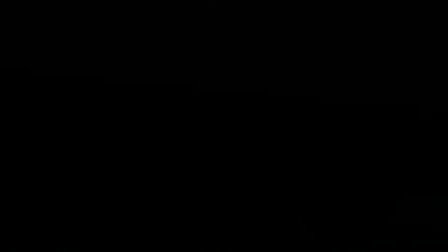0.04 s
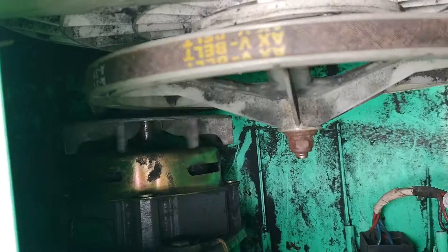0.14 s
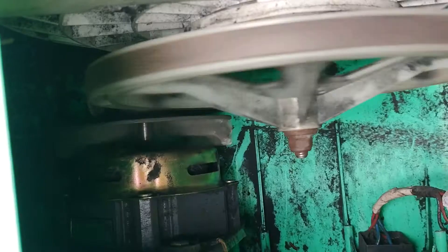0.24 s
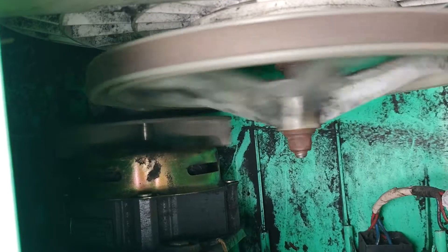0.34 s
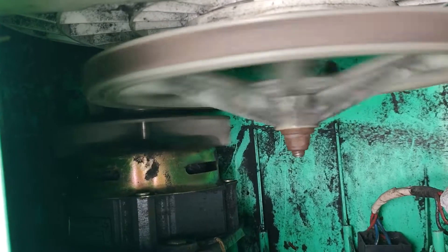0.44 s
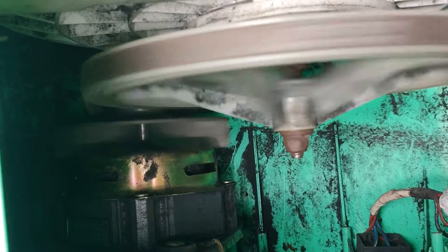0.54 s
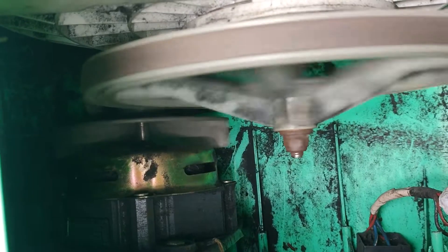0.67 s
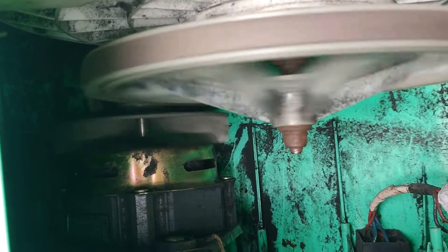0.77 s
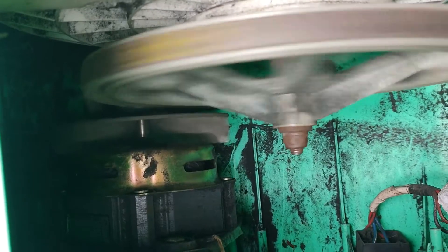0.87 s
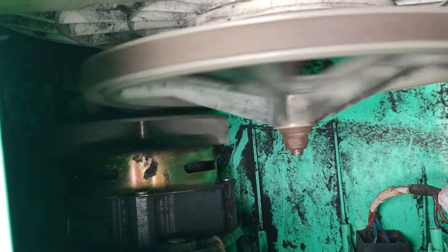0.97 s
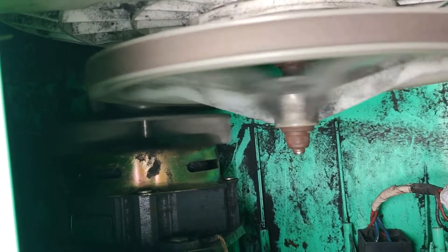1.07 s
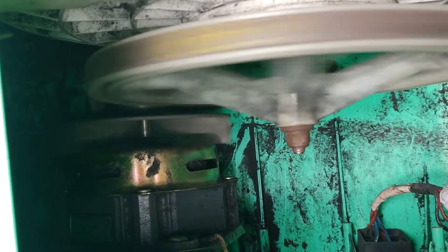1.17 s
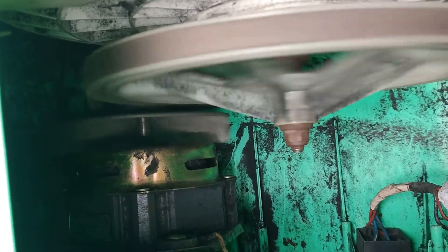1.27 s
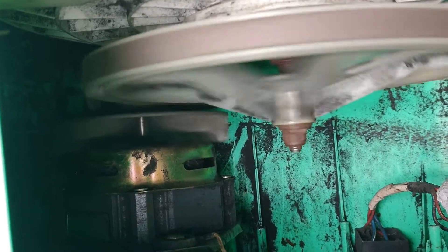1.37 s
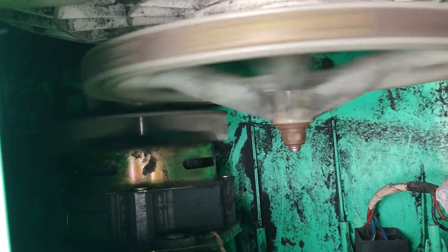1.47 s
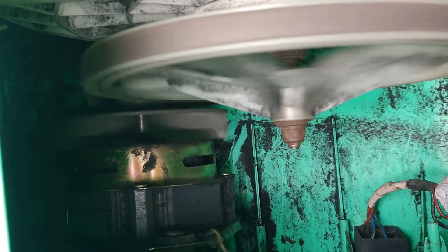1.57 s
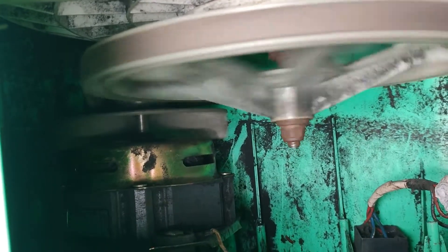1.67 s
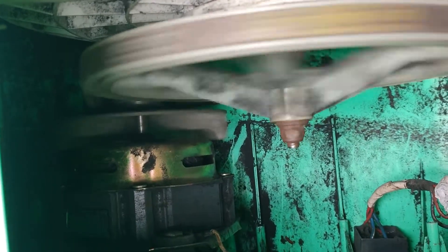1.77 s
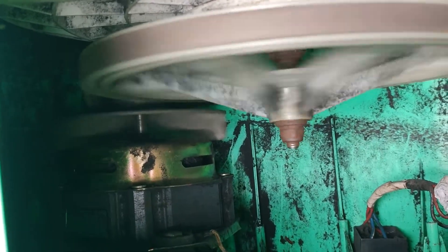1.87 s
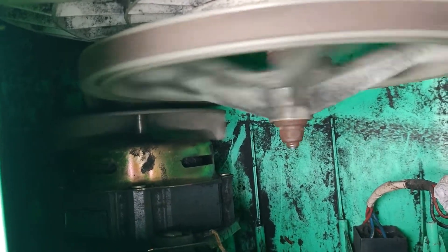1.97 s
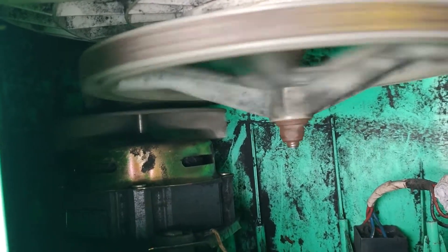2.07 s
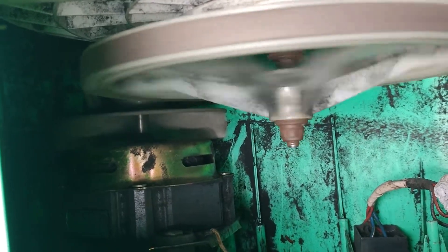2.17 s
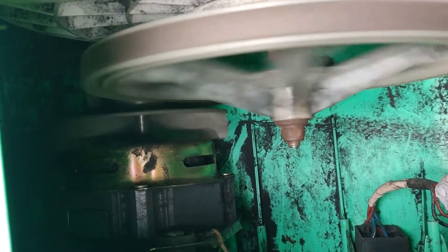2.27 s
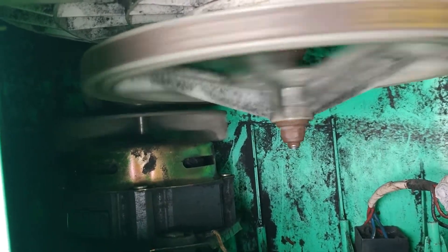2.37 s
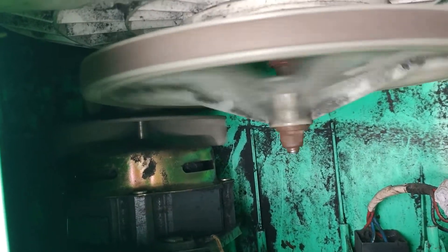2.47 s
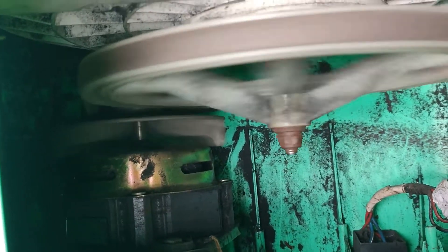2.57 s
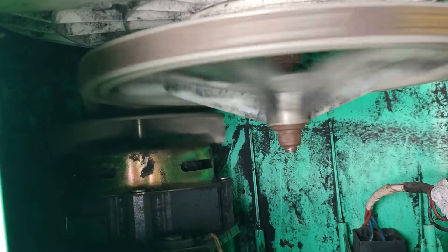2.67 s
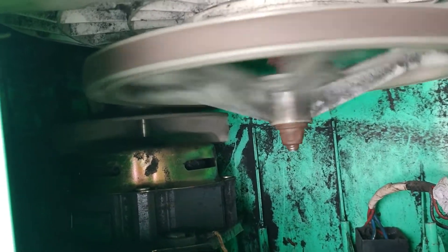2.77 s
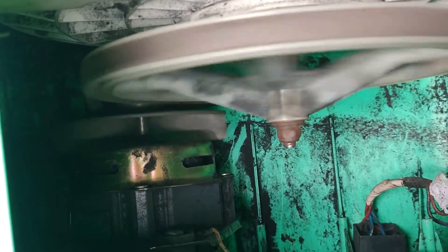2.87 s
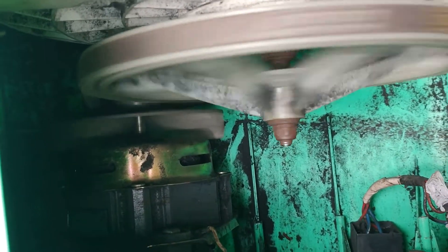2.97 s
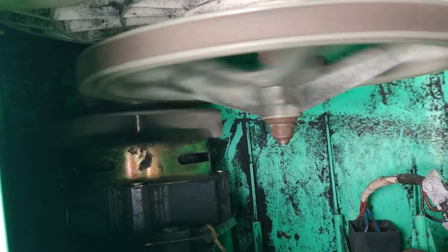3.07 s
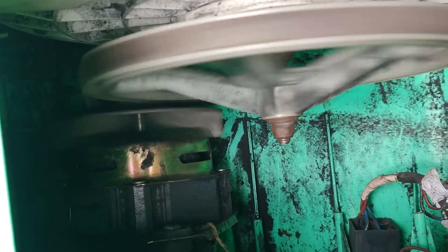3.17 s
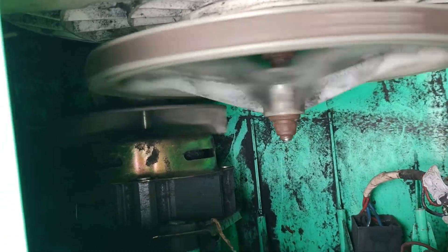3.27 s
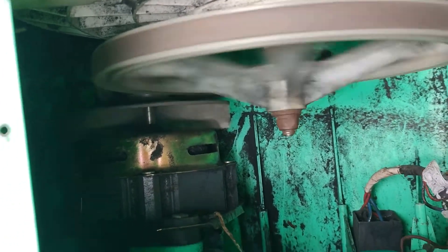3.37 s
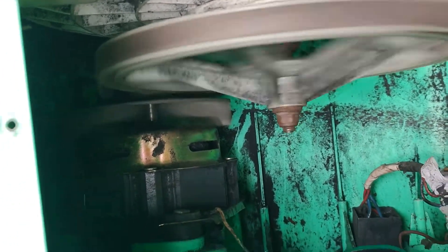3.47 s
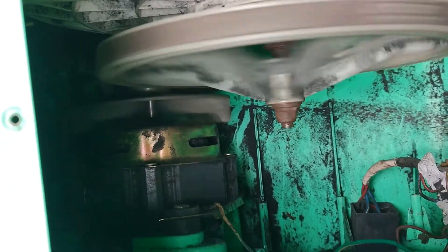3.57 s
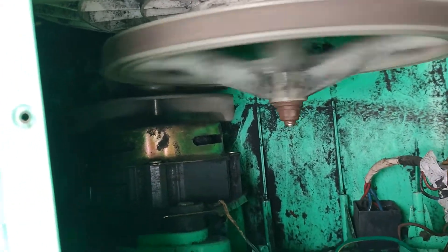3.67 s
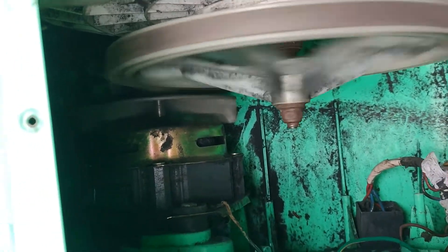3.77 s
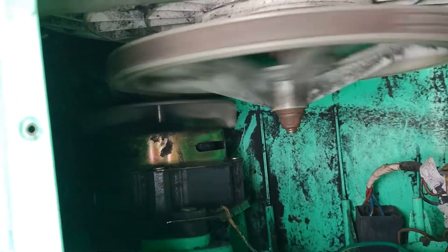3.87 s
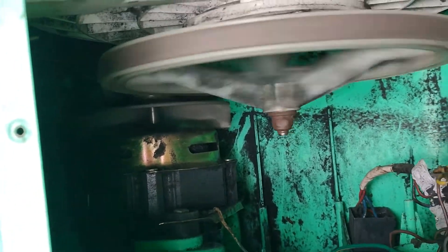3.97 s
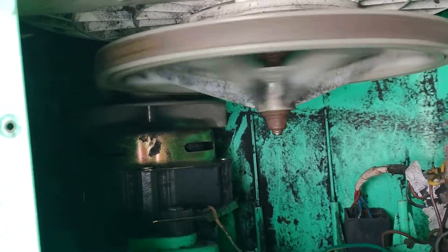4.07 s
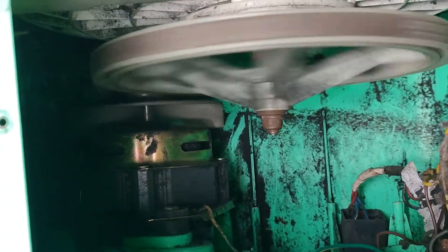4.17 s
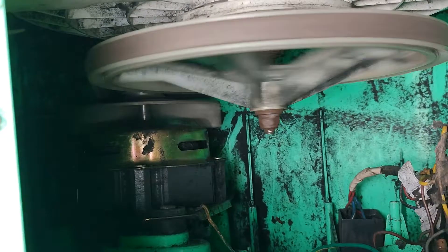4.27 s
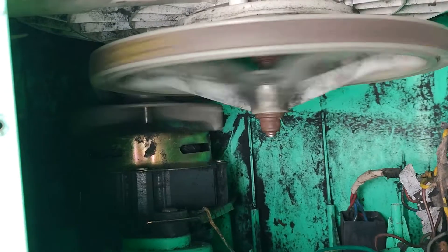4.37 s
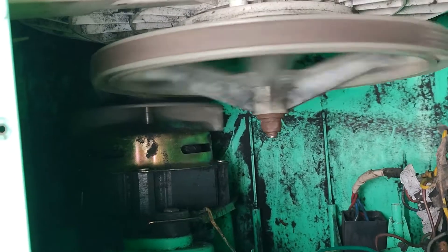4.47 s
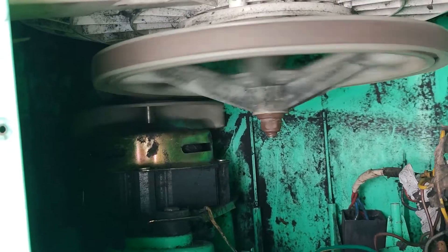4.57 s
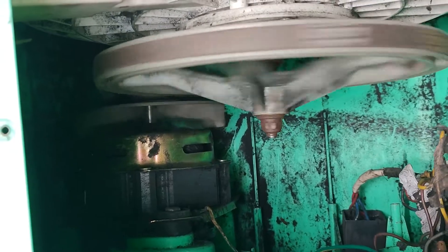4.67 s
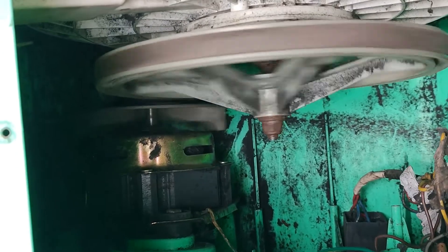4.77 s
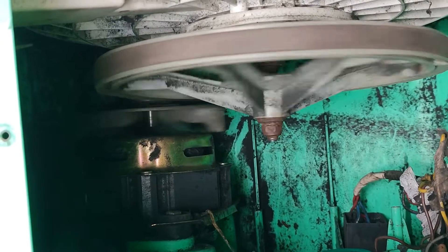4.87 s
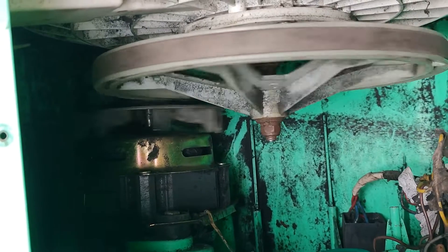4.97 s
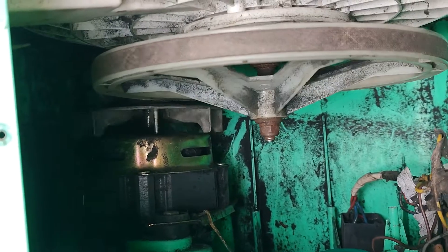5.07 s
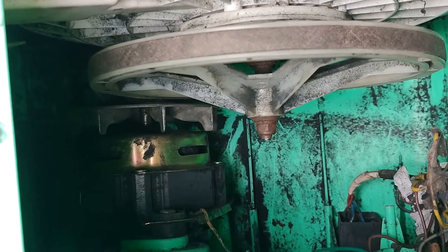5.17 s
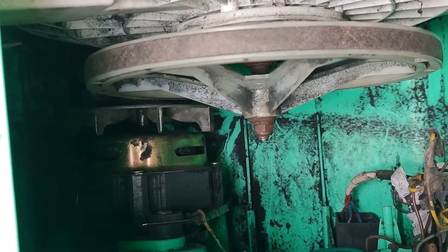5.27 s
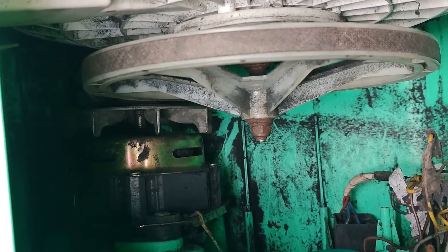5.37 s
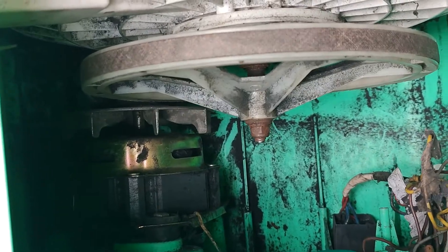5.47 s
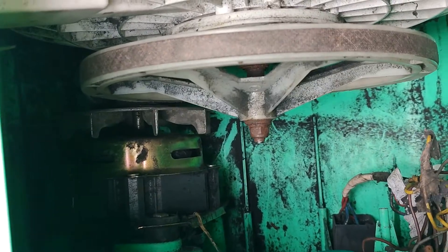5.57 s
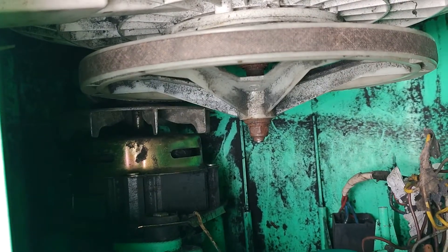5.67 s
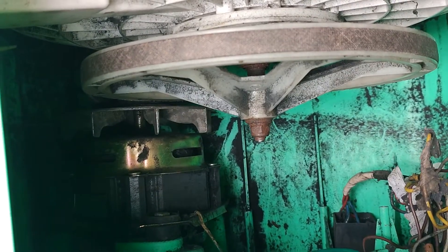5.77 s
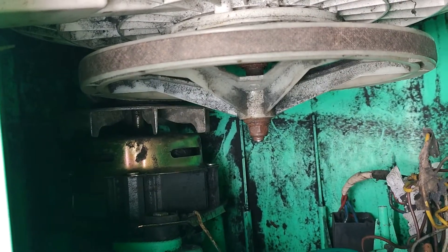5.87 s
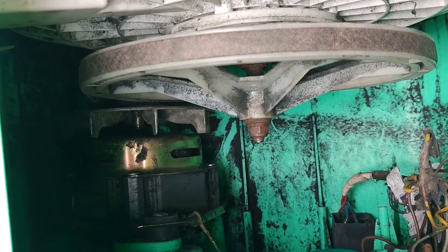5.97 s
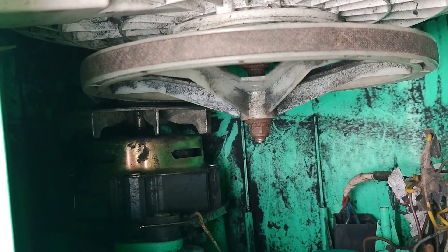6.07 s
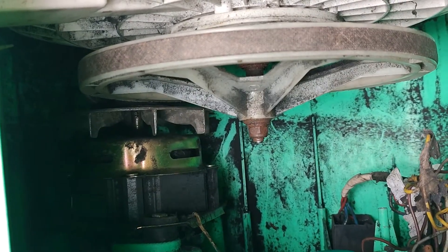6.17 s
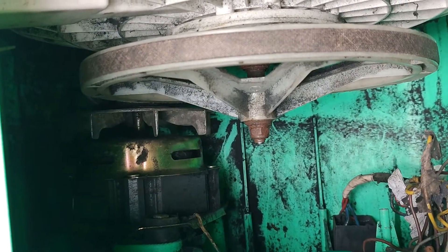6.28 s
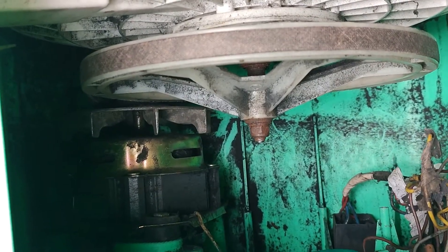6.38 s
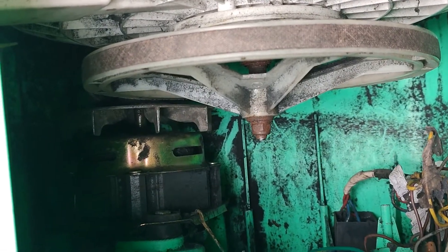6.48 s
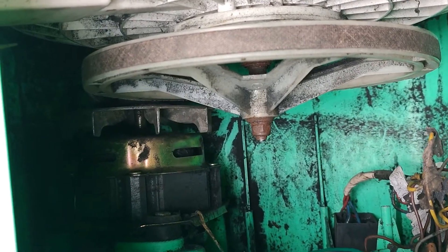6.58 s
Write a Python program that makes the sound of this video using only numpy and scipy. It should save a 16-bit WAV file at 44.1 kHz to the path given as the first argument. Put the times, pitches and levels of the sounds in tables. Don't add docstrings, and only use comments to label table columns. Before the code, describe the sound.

A switch clacks, a washing machine motor instantly spins up into a loud, throbbing hum with rattling cabinet, then cuts off as a motorbike approaches.

```python
import sys
import numpy as np
from scipy import signal
from scipy.fft import rfft, irfft, next_fast_len
from scipy.io import wavfile

SR = 44100
rng = np.random.default_rng(int(sys.argv[2]) if len(sys.argv) > 2 else 0)


def how_loud(loudness_db):
    steps = np.asarray(loudness_db, float) / 20
    return 10 ** steps


def master_out(mix):
    frames = np.transpose(np.atleast_2d(mix))
    ceiling = np.clip(frames, -1, 1)
    pcm = np.round(ceiling * 32767).astype(np.int16)
    wavfile.write(sys.argv[1], SR, pcm)


N = 292383

# frequency in Hz, level in dB per Hz.
FLOOR_COLOUR = [(18, -17), (30, 1), (130, -0.5), (360, -8), (450, -12.5), (1000, -15), (1800, -17),
                (4000, -27.5), (7600, -35), (14000, -40)]
# frequency in Hz, left-right likeness from -1 to 1.
LIKENESS = [(60, 0.96), (130, 0.93), (290, 0.81), (640, 0.91), (1390, 0), (3060, 0.096), (6720, 0)]
# time in seconds, speed as a share of full.
DRIVE_SPEED = [
    (.238, 0.01),
    (.36, 0.57),
    (.46, 0.99),
    (4.63, 0.99),
    (4.7, 0.8),
    (4.8, 0.72),
    (4.94, 0.46),
    (5.08, .45),
    (5.16, 0.09),
]
# time in seconds, level in dB.
HUM_LEVEL = [
    (.234, -90),
    (.24, -29),
    (.38, -28),
    (.46, -20),
    (4.62, -20),
    (4.66, -57),
    (4.7, -88),
]
# multiple of the turn rate, level in dB.
SHAFT_ORDERS = [(2, -31.5), (3, -24), (4, -36), (5, -39.5), (6, -33.5), (7, -32), (10, -42), (12, -42.5)]
BELT_ORDERS = [(9, -33.5), (11, -67), (12, -35), (14, -52), (16, -55), (17, -31), (21, -34), (22, -33),
               (23, -29.5), (24, -53), (27, -43.5), (30, -40), (32, -37)]
PULLEY_ORDERS = [(12, -34), (14, -36.5), (22, -30.5), (28, -41)]
# frequency at full speed in Hz, level in dB.
MIXED_TONES = [(102.9, -37), (163.8, -35.5), (172.6, -26), (205.6, -28), (207.7, -33.5), (212.1, -30)]
# frequency in Hz, level in dB per Hz.
BOOM_COLOUR = [(30, -31), (45, 5.5), (70, 0), (100, 6.5), (130, -4), (160, 10), (210, 7), (250, 2),
               (300, -36.5)]
# frequency in Hz, width in Hz, level in dB.
PANELS = [(250, 85, -3), (341.6, 75, 2.5), (486.4, 66, 2.5), (570, 75, 0), (849, 57, -6),
          (1087, 136, -12.5), (1500, 42, -14.5), (2020, 230, -18.5)]
# frequency in Hz, level in dB per Hz.
RUB_COLOUR = [(350, -15), (600, 0), (700, -15.5), (1260, -12), (2020, -15), (3850, -21.5), (5500, -20),
              (7400, -17.5), (8400, -28), (9500, -20.5), (14000, -26.5)]
# time in seconds, peak in dB, brightness in dB per octave.
CLACKS = [(0.238, -10.5, 3.5), (0.252, -17, 1.5), (0.366, -33, -1), (0.388, -28, -1), (0.485, -28, -11),
          (1.266, -19.5, -2), (1.371, -19, -7), (5.006, -35, 0), (1.231, -24, -7), (1.725, -18.5, -6)]
# frequency in Hz, level in dB, 60 dB decay in seconds.
CHASSIS_MODES = [(233, -2, 0.073), (320, 3.5, 0.053), (436, 3.5, 0.03), (590, -21, 0.05),
                 (840, -10.5, 0.071), (1003, -2, 0.063), (1126, -13, 0.059), (1485, -17, 0.17),
                 (2143, -4, 0.061), (2600, -13, 0.03), (7100, -12, 0.0087)]
# frequency in Hz, level in dB per Hz.
CRACK_COLOUR = [(200, -6), (500, 2), (1200, -6), (2300, -2), (4000, -9.5), (7300, -10), (14000, -10)]
# time in seconds, level in dB, spread in seconds.
BRUSH = (5.245, -33, .01)
# time in seconds, frequency in Hz, width in Hz, level in dB, spread in seconds.
BRACKET_RINGS = [(.285, 1500, 25, -43, 0.023), (.392, 613, 150, -28, 0.01), (.316, 2700, 700, -43, 0.014),
                 (.395, 2600, 200, -42, 0.0041), (.72, 1500, 30, -48, .06), (1.22, 1500, 50, -41.5, 0.023),
                 (1.66, 1500, 29.91, -56, 0.034), (1.8, 1500, 50, -44, 0.086),
                 (2.6, 1500, 50, -42.5, 0.057), (2.85, 1500, 29.6, -49, 0.13), (4.2, 806, 39, -44, 0.16),
                 (4.55, 859, 40.5, -44, 0.066), (4.2, 1740, 40, -60, .1)]
# frequency in Hz, level in dB per Hz.
CAR_COLOUR = [(290, -8), (500, -6), (850, -8.5), (1160, -7.5), (1830, -13.5), (2760, -15.5), (3670, -18),
              (7360, -22), (14000, -25.5)]
# time in seconds, frequency in Hz, width in Hz, level in dB,
# spread in seconds.
TREAD_TONES = [(3.07, 1450, 80, -43, .05), (3.15, 1820, 60, -45, .03), (3.2, 2800, 120, -46, .06),
               (3.22, 880, 60, -40, .03), (3.27, 1150, 60, -37, .05), (3.38, 1100, 80, -41, .03),
               (3.42, 2750, 90, -43, .025)]
# time in seconds, firings per second.
FIRING_RATE = [(4.6, 37.2), (5.12, 37.8), (5.6, 38.8), (6.0, 39.45), (6.4, 39.95), (6.63, 40.0)]
# time in seconds, nearness in dB, wall echo lag in ms, lowest casing ring in Hz.
BIKE_APPROACH = [(4.6, -51, 14.5, 860), (5.12, -51, 11.3, 866), (5.45, -48.5, 8.2, 872),
                 (5.7, -47, 6.1, 890), (5.9, -45, 4.6, 898), (6.0, -43.5, 2.97, 892), (6.22, -40, 2, 882),
                 (6.42, -36.5, 1.87, 873.4), (6.63, -35.5, 1, 925)]
# firing order, level when near in dB, share of the approach.
EXHAUST_ORDERS = [(1, -33, 1.5), (2, -33.5, 0.73), (3, -28.5, 0.65), (4, -32, 1.13), (5, -33, 0.94),
                  (6, -44, 1.5), (7, -35, 2.05), (8, -44.5, 0.76), (9, -46, 0.87), (10, -47, 0.66),
                  (11, -56, .9), (12, -48.5, 0.72), (13, -67, .9), (14, -52, 0.82)]
# frequency in Hz, level in dB per Hz.
BIKE_COLOUR = [(120, -26), (200, -2.5), (300, -13.5), (360, -14), (750, -15.5), (1460, -14.5),
               (3000, -19.5), (7500, -28.5), (8700, -22), (14000, -29.5)]
# time in seconds, frequency in Hz, width in Hz, level in dB, spread in seconds.
BIKE_RINGS = [(5.13, 2550, 200, -55.5, .25), (5.86, 2690, 70, -54, .11), (6.3, 2710, 60, -45, .04),
              (6.31, 880, 37, -32, 0.045), (6.38, 1270, 36, -42.5, 0.15), (6.6, 1270, 25, -36, .05),
              (6.44, 1362, 32, -40.5, .1), (6.37, 1660, 70, -47, .05), (6.52, 1660, 45, -45, 0.041),
              (6.52, 2190, 35, -39.5, 0.045), (6.3, 3250, 88, -51, 0.23), (6.555, 3240, 90, -48, .035),
              (6.5, 5490, 60, -51, 0.1), (6.1, 8550, 450, -53.5, .3)]
# frequency in Hz, gain in dB.
PORT_LEFT = [(60, 0.5), (120, 0.5), (200, -1.6), (700, 1), (1500, -1), (4000, -1.5), (7000, -3.5),
             (8800, 0), (9500, -10.5), (10500, -14.5), (12000, -4), (14200, -3.5)]
PORT_RIGHT = [(60, 0), (120, 0), (200, 0.3), (700, 0), (1500, 3), (4000, 2.5), (7400, 4), (8200, -1),
              (9000, -16.5), (10500, -8), (12000, -7.5), (14200, -7)]

MAINS_HUM_HZ, SHAFT_HZ, BELT_HZ, PULLEY_HZ = 120.3, 28.43, 6.58, 7.277
SWITCH_S, CUT_S, LET_GO_S = .237, 4.64, 0.082
GRIP_S = 0.328


def in_time(rows):
    s, *columns = np.transpose(rows)
    return [np.interp(np.arange(N) / SR, s, c) for c in columns]


def at_hz(points, hz):
    point_hz, value = np.transpose(points)
    return np.interp(np.log(hz + 1), np.log(point_hz), value)


def rms_one(x):
    return x / np.sqrt(np.mean(x ** 2) + 1e-20)


def ramp(start_s, length_s):
    return np.clip((np.arange(N) / SR - start_s) / length_s, 0, 1)


def dying(db, start_s, t60_s):
    since_s = np.clip(np.arange(N) / SR - start_s, 0, None)
    return ramp(start_s, .003) * how_loud(db - 60 * since_s / t60_s)


def drift(rate_hz):
    r = np.exp(-80 * np.pi * rate_hz / SR)
    slow = signal.lfilter([1], [1, -2 * r, r * r], rng.standard_normal(N // 40 + 2002))[2000:]
    return np.interp(np.arange(N) / 40, np.arange(len(slow)), rms_one(slow))


def resonate(x, hz, width_hz):
    r = np.exp(-np.pi * width_hz / SR)
    poles = [1, -2 * r * np.cos(2 * np.pi * hz / SR), r * r]
    return signal.lfilter([(1 - r * r) / 2, 0, (r * r - 1) / 2], poles, x)


def stereo_noise(spectrum, patchy_db):
    size = next_fast_len(N, True)
    hz = np.arange(size // 2 + 1) * SR / size
    alike = np.clip(at_hz(LIKENESS, hz), -1, 1)
    mid, side = rfft(rng.standard_normal((2, size))) * how_loud(at_hz(spectrum, hz))
    pair = np.sqrt(1 + alike) * mid + np.sqrt(1 - alike) * side * [[1], [-1]]
    out, together = 0, drift(6.8)
    for centre_hz in 40 * 4.0 ** np.arange(5):
        bands_away = np.log(np.clip(hz, 40, 10240) / centre_hz) / np.log(4)
        share = np.cos(np.clip(bands_away, -1, 1) * np.pi / 2) ** 2
        flicker = how_loud(patchy_db * (0.52 * together + drift(23.6)))
        out = out + irfft(pair * share, size)[:, :N] * flicker
    return rms_one(out)


def tones(cycles, rows, wobble_db):
    out = 0
    for order, db in rows:
        level = np.sqrt(2) * how_loud(db + wobble_db * drift(2.64))
        out = out + level * np.sin(2 * np.pi * (order * cycles + rng.random()))
    return out


def sung(rows, drive):
    t, out = np.arange(N) / SR, np.zeros((2, N))
    for s, hz, width_hz, db, spread_s in rows:
        a = max(int((s - 4 * spread_s) * SR), 0)
        b = min(int((s + 4 * spread_s) * SR), N)
        tone = rms_one(resonate(resonate(drive[:, a:b], hz, width_hz), hz, width_hz))
        out[:, a:b] += how_loud(db) * np.exp(-((t[a:b] - s) / spread_s) ** 2 / 2) * tone
    return out


def running():
    return np.interp(np.arange(N) / SR, [.236, .24, 5.08, 5.16], [0, 1, 1, 0])


def street_floor():
    return how_loud(-44.5) * stereo_noise(FLOOR_COLOUR, patchy_db=1.6)


def motor():
    (speed,), (hum_db,) = in_time(DRIVE_SPEED), in_time(HUM_LEVEL)
    t, turned_s = np.arange(N) / SR, np.cumsum(speed) / SR
    hum = how_loud(hum_db) * tones(MAINS_HUM_HZ * t, [(1, 0), (3, -27)], wobble_db=1.25)
    orders = tones(SHAFT_HZ * turned_s, SHAFT_ORDERS, wobble_db=0.5)
    orders += tones(turned_s, MIXED_TONES, wobble_db=0.0)
    orders += tones(BELT_HZ * turned_s, BELT_ORDERS, wobble_db=-1.5)
    orders += tones(PULLEY_HZ * turned_s, PULLEY_ORDERS, wobble_db=-1.5)
    return running() * (hum + speed ** 5 * orders)


def cabinet():
    (speed,), t = in_time(DRIVE_SPEED), np.arange(N) / SR
    turned_s = np.cumsum(speed) / SR
    lumps_db, cut = 2 * drift(11.2), ramp(CUT_S, LET_GO_S)
    jolt = dying(-20.5, SWITCH_S, t60_s=0.16)
    boom_level = how_loud(-23 + lumps_db) * speed ** 1.95 + 0.43 * jolt
    boom = boom_level * stereo_noise(BOOM_COLOUR, patchy_db=0.45)
    shaft_knock_db = 2.0 * np.cos(4 * np.pi * SHAFT_HZ * turned_s)
    belt_knock_db = 1.9 * np.cos(2 * np.pi * BELT_HZ * (t - 2.47))
    shaking = how_loud(shaft_knock_db + belt_knock_db) * stereo_noise([(200, 0), (3000, 0)], patchy_db=1.3)
    rattle = 0
    for k, (hz, width_hz, db) in enumerate(PANELS):
        rattle = rattle + (-1) ** k * how_loud(db) * resonate(shaking, hz, width_hz)
    coasting = (speed / 0.84) ** (5.5 * cut)
    rattle_level = how_loud(-30.5 + 0.28 * lumps_db - 6.5 * cut) * coasting + jolt
    return running() * (boom + rattle_level * rms_one(rattle))


def belt():
    (speed,), t = in_time(DRIVE_SPEED), np.arange(N) / SR
    cut = ramp(CUT_S, LET_GO_S)
    pull = how_loud(-36.5 - .5 * t - 15 * cut) * speed ** (2.7 * (1 - cut))
    pull = pull * (1 - ramp(5.15, 0.14))
    slip = how_loud(-41) * (1 - ramp(GRIP_S, 0.011))
    throb_db = 2.74 * np.cos(2 * np.pi * BELT_HZ * (t - 2.512))
    throb_db += 1.2 * np.cos(2 * np.pi * PULLEY_HZ * (t - 2.539))
    flutter_db = 1.04 * np.cos(6 * np.pi * SHAFT_HZ * t) + 1.6 * np.cos(2 * np.pi * SHAFT_HZ * t)
    level = ramp(SWITCH_S, .012) * (pull + slip) * how_loud(throb_db + flutter_db)
    return level * stereo_noise(RUB_COLOUR, patchy_db=1.55)


def clacks():
    t, out = np.arange(N) / SR, np.zeros((2, N))
    contacts = rng.choice([-1, 1], (2, N)) * [[1], [.5]]
    for hz, mode_db, t60_s in CHASSIS_MODES:
        push = 0
        for s, db, bright_db in CLACKS:
            hit_db = db + mode_db - 23.5 + bright_db * np.log2(hz / 500)
            push = push + (t >= s) * how_loud(hit_db - 60 * np.clip(t - s, 0, 1) / 0.01)
        r, w = how_loud(-60 / (t60_s * SR)), 2 * np.pi * hz / SR
        poles = [1, -2 * r * np.cos(w), r * r]
        mid, side = signal.lfilter([0, np.sin(w)], poles, push * contacts + 1e-18)
        out += mid + side * min(hz / 1500, 1) * [[1], [-1]]
    crack = dying(-18, SWITCH_S, t60_s=0.036)
    grind = dying(-33, SWITCH_S, t60_s=0.41) * (1 - ramp(GRIP_S, .008))
    s, db, spread_s = BRUSH
    brush = how_loud(db) * np.exp(-((t - s) / spread_s) ** 2 / 2)
    bare = stereo_noise(CRACK_COLOUR, patchy_db=0)
    brighter = np.diff(bare, prepend=0) / 2
    return out + (crack + grind) * bare + brush * brighter


def brackets():
    return sung(BRACKET_RINGS, rng.standard_normal((2, N)))


def car():
    gone_s = np.arange(N) / SR - 3.335
    pace_s = np.where(gone_s < 0, 0.35, .2)
    spreading_db = 12.5 * np.log10(1 + (gone_s / pace_s) ** 2)
    doorway_db = 2.5 * (gone_s / 1.6) ** 8
    level_db = np.maximum(-28.5 - spreading_db - doorway_db, -120)
    roar = how_loud(level_db) * stereo_noise(CAR_COLOUR, patchy_db=0.8)
    return roar + sung(TREAD_TONES, rng.standard_normal((2, N)))


def motorbike():
    (rate_hz,), (near_db, lag_ms, ring_hz) = in_time(FIRING_RATE), in_time(BIKE_APPROACH)
    t, full_db = np.arange(N) / SR, -37
    cycles = np.cumsum(rate_hz) / SR + .3
    heard = np.interp(t, [4.2, 5.1], [0, 1])
    smear = np.interp(t, [5.95, 6.35], [1, .4])
    echo = np.interp(t, [6.1, 6.4], [.92, .4])
    late_cycles = rate_hz * lag_ms / 1000
    pulses = 0
    for k, db, share in EXHAUST_ORDERS:
        angle = 2 * np.pi * (k * cycles + smear * rng.uniform(-0.59, 0.46))
        level = how_loud(db + share * (near_db - full_db) + 1.7 * drift(2.5))
        wall = echo * min(k / 3, 1) / max(k / 3, 1) ** 0.93
        pulses = pulses + level * (np.cos(angle) + wall * np.cos(angle - 2 * np.pi * k * late_cycles))
    gate = how_loud(0.61 * np.cos(2 * np.pi * cycles))
    firings = rms_one(np.diff(np.floor(cycles), prepend=0) * how_loud(3.1 * drift(4.8)))
    struck = 0.8 * np.array([firings, np.roll(firings, 30)]) + gate * rng.standard_normal((2, N))
    lowpass = signal.butter(2, 38, fs=SR, output="sos")
    slow = signal.sosfilt(lowpass, rng.standard_normal((2, 2, N)))
    ring_angle = 2 * np.pi * np.cumsum(ring_hz) / SR
    low_ring = rms_one(slow[0] * np.cos(ring_angle) + slow[1] * np.sin(ring_angle)) * gate
    low_ring_db = full_db + 0.66 * (near_db - full_db) - 4
    hiss = how_loud(near_db + 4.5) * gate * stereo_noise(BIKE_COLOUR, patchy_db=1.06)
    return heard * (pulses + hiss + how_loud(low_ring_db) * low_ring + sung(BIKE_RINGS, struck))


def scene():
    machine = motor() + cabinet() + belt() + clacks() + brackets()
    return street_floor() + machine + car() + motorbike()


def top_cut(x):
    return signal.sosfilt(signal.butter(12, 15360, fs=SR, output="sos"), x)


def record(dry):
    start_s, top_hz = .0745, 14370
    size = next_fast_len(N, True)
    hz = np.arange(size // 2 + 1) * SR / size
    ports = how_loud(np.array([at_hz(PORT_LEFT, hz), at_hz(PORT_RIGHT, hz)])) * (hz < top_hz)
    coloured = irfft(rfft(dry, size) * ports, size)[:, :N]
    mix = coloured * (np.arange(N) > start_s * SR)
    return top_cut(mix)


dry = scene()
out = record(dry)
master_out(out)
```